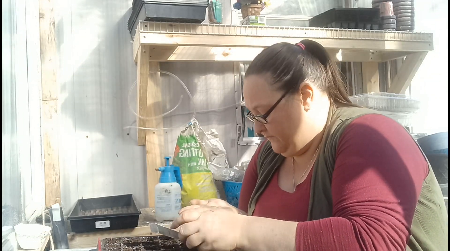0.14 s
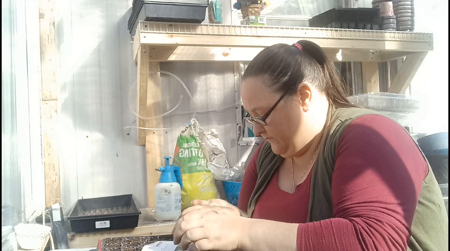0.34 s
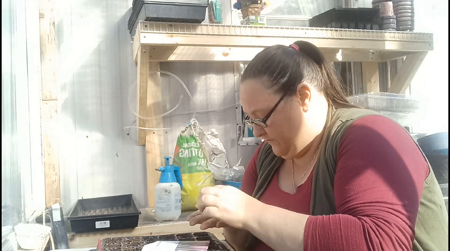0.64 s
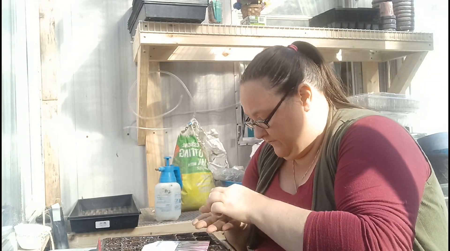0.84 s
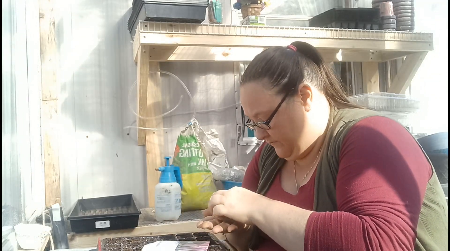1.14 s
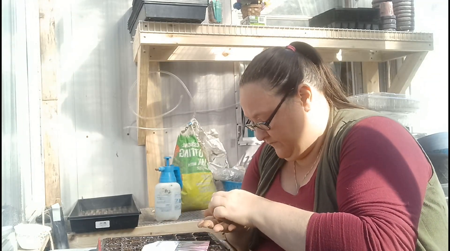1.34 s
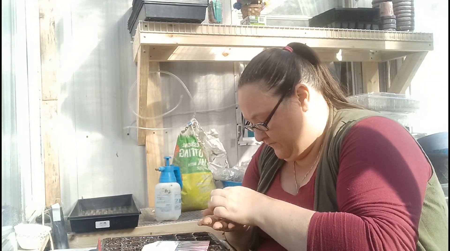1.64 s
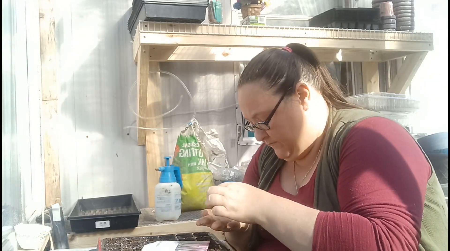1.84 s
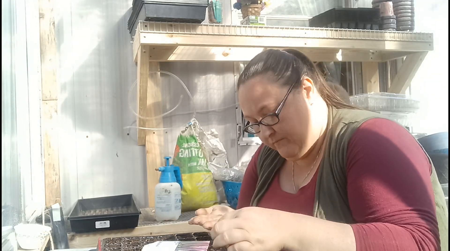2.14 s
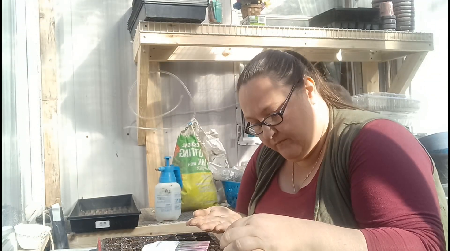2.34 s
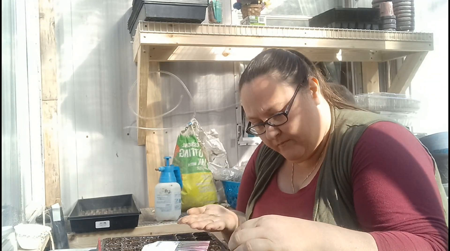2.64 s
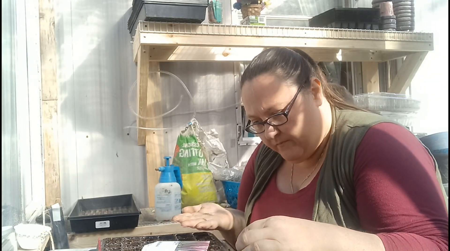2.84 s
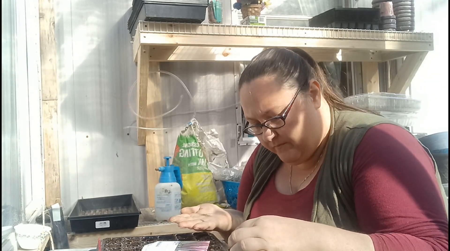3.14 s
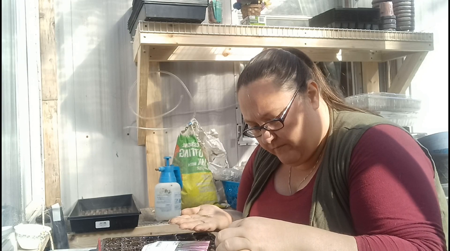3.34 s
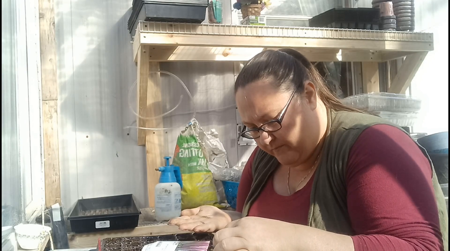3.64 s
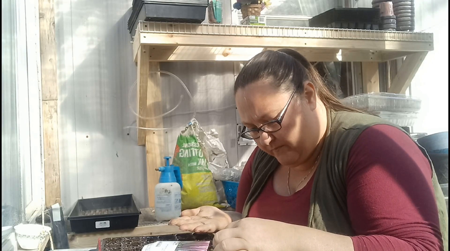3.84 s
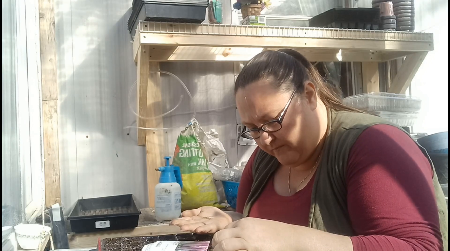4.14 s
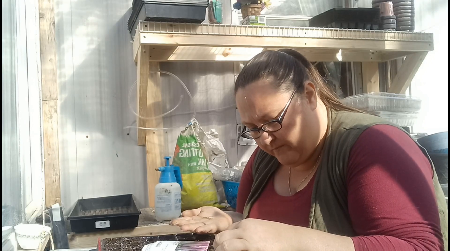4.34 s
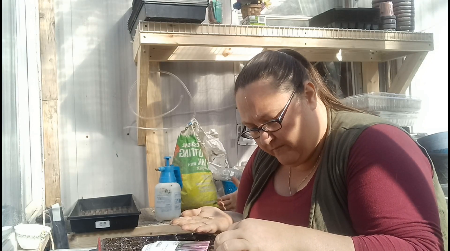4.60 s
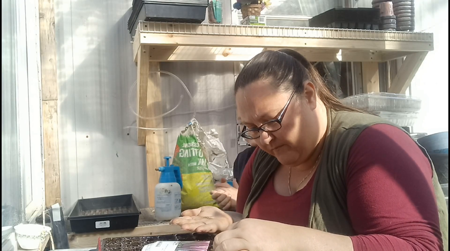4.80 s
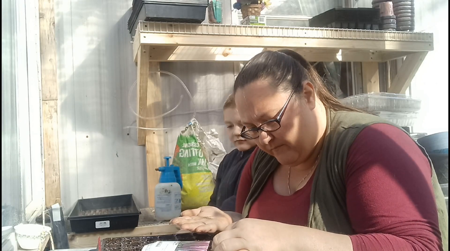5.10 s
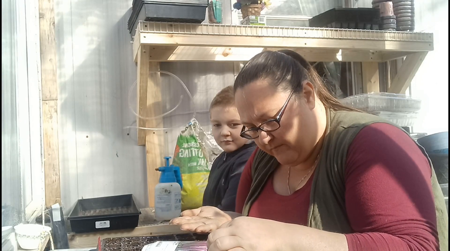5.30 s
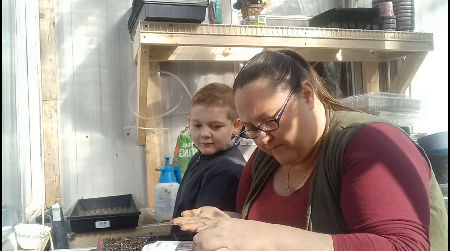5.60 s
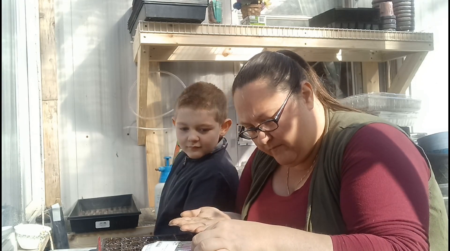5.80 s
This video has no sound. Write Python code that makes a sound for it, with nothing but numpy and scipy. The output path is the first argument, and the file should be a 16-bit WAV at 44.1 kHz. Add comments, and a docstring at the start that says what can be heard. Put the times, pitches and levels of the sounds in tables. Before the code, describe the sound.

A paper seed packet rustles softly with sliding seeds, then is flicked and tapped sharply a few times in a small greenhouse.

```python
"""A low rumble and a far bird come into a small greenhouse, where fingers rub a paper seed packet.
The paper rustles in tiny stick-slip clicks, seeds hiss as they slide inside, creases give way and hands
bump the wooden bench. Then the packet is flicked and tapped to shake the seeds out: its face pops through
and its hollow body rings. Close, hard walls wrap the sounds in a short dense echo."""
import sys
import numpy as np
from scipy import signal
from scipy.fft import rfft, irfft
from scipy.io import wavfile
from scipy.ndimage import uniform_filter1d

SR = 44100
rng = np.random.default_rng(int(sys.argv[2]) if len(sys.argv) > 2 else 0)


def transcribe(u):
    """Save the signal u as a 16-bit wav file named by the first command-line argument.

    u: samples, shape (n,) or (channels, n), limited to [-1, 1]; the rate is SR.
    q: integer samples, one column per channel.
    """
    v = np.clip(np.atleast_2d(u).T, -1, 1)
    q = np.round(v * 32767).astype(np.int16)
    wavfile.write(sys.argv[1], SR, q)


N = 262742
TIME = np.arange(N) / SR


def from_db(db):
    """Decibels to gain."""
    return 10 ** (np.asarray(db) / 20)


def rms_one(x):
    """Scale to rms 1."""
    return x / np.sqrt(np.mean(x ** 2) + 1e-20)


def at_hz(points, hz):
    """Read a curve on a log-frequency axis."""
    known_hz, values = np.transpose(points)
    return np.interp(np.log(np.maximum(hz, 1)), np.log(known_hz), values)


def convolve(x, response):
    """Filter each channel, keeping the length."""
    return signal.fftconvolve(np.atleast_2d(x), np.atleast_2d(response), axes=-1)[:, :np.shape(x)[-1]]


def body(eq, modes=(), tilt_db_per_octave=0, size=8192):
    """Minimum-phase response of unit energy: a broad EQ curve with resonant peaks on it."""
    hz = np.fft.rfftfreq(size, 1 / SR)
    level_db = at_hz(eq, hz) + tilt_db_per_octave * np.log2(np.maximum(hz, eq[0][0]))
    for centre_hz, width_hz, boost_db in modes:
        level_db = level_db + boost_db / (1 + (2 * (hz - centre_hz) / width_hz) ** 2)
    cepstrum = irfft(np.log(from_db(level_db)))[:size // 2]
    cepstrum[0] = 0
    response = irfft(np.exp(rfft(2 * cepstrum, size)))[:size // 2]
    return response / np.linalg.norm(response)


def swells(rows, drop_db=10.5, roundness=1.5):
    """Envelope in dB of overlapping swells, each drop_db down one attack before or release after its peak."""
    t, power = TIME[::32], 1e-14
    for peak_s, attack_s, release_s, level_db in rows:
        away = np.abs(t - peak_s) / np.maximum(np.where(t < peak_s, attack_s, release_s), 1 / SR)
        power = power + from_db(level_db - drop_db * away ** roundness) ** 2
    return np.interp(TIME, t, 10 * np.log10(power))


# stereo image of the room: freq_hz, left_right_correlation
ROOM_CORRELATION = [(60, 0.86), (200, 0.76), (450, 0.56), (900, -0.18), (2000, 0.14), (8000, -0.02)]

def diffuse(size):
    """Stereo noise arriving from all sides: alike in the bass, unrelated in the treble."""
    mid, side = rfft(rng.standard_normal((2, size)))
    alike = at_hz(ROOM_CORRELATION, np.fft.rfftfreq(size, 1 / SR))
    return irfft(np.sqrt(1 + alike) * mid + np.sqrt(1 - alike) * side * [[1], [-1]], size)


# reverb time of the greenhouse: freq_hz, t60_s
ROOM_DECAY = [(100, 0.37), (300, 0.22), (700, 0.24), (1500, 0.16), (4000, 0.22), (8000, 0.21),
              (14000, 0.14)]

def greenhouse(direct_db, build_s=0.0019, lumpy_db=5.0, size=16384, bands=7):
    """Room response from one spot: weak direct sound, then early reflections melting into a tail."""
    t, hz = np.arange(size) / SR, np.fft.rfftfreq(size, 1 / SR)
    reflections = from_db(lumpy_db * np.clip(rng.standard_normal(size), -2, 2) * np.exp(-t / 0.0079))
    field = rfft(diffuse(size) * reflections / np.sqrt(uniform_filter1d(reflections ** 2, size=201)))
    centres_hz, tail = np.geomspace(100, 15000, bands), 0
    for centre_hz, share in zip(centres_hz, np.eye(bands)):
        band = irfft(field * at_hz(np.c_[centres_hz, share], hz))
        tail = tail + band * from_db(-60 * t / at_hz(ROOM_DECAY, centre_hz))
    tail = tail * (1 - np.exp(-t / build_s))
    response = tail / np.linalg.norm(tail, axis=1, keepdims=True)
    response[:, 0] += from_db(direct_db)
    return response / np.linalg.norm(response, axis=1, keepdims=True)


# soft low thumps: peak_s, attack_s, release_s, level_db
LOW_THUMPS = [(0.15, 0.21, 0.24, -70.5), (2.18, 0.093, 0.043, -56), (2.85, 0.062, 0.039, -64),
              (3.83, .04, 0.045, -61.5), (4.08, 0.07, 0.095, -70.5), (4.6, 0.23, 0.37, -64.5),
              (4.83, 0.042, 0.077, -53.5), (5.53, 0.1, 0.2, -52.5)]
# tone of the low end (rumble and thumps) and of the air: freq_hz, gain_db
LOW_END_EQ = [(20, -44), (40, -13), (55, -3.5), (68, -2), (80, 3), (100, -10.5), (150, -25), (300, -36),
              (800, -31.5)]
AIR_EQ = [(88, -40), (150, 1), (366, -9.5), (844, -14.5), (3000, -9), (7270, -2), (9180, -8), (12800, -2.5),
          (15500, -7)]

def ambience(rumble_db=-73.5, wander_db=0.4, wander_s=0.081, air_db=-72):
    """A steady low rumble, with soft low thumps from handling and perhaps footsteps, under a faint hiss."""
    wander = np.interp(TIME / wander_s, np.arange(64), rng.standard_normal(64))
    envelope = np.hypot(from_db(rumble_db - wander_db * wander), from_db(swells(LOW_THUMPS)))
    low_end = envelope * rms_one(convolve(diffuse(N), body(LOW_END_EQ)))
    air = from_db(air_db) * rms_one(convolve(diffuse(N), body(AIR_EQ)))
    return low_end + air


# faint high calls, all from a far bird except the short whistle at 0.35 s: start_s, length_s, start_pitch_hz,
# end_pitch_hz, level_db
BIRD_CHIRPS = [(0.0, .05, 3480, 3540, -73), (0.13, .13, 3800, 3950, -75.5), (0.35, .07, 3560, 3620, -76),
               (1.043, .13, 3260, 3260, -75.5), (1.097, .07, 3810, 4100, -76),
               (1.337, .08, 3680, 3400, -76.5), (1.64, .04, 7400, 6740, -77), (2.35, .07, 3060, 3310, -81)]

def bird(warble=0.053):
    """A far bird sings short warbling glides, blurred by the walls; the short whistle at 0.35 s is not the
    bird's."""
    song = np.zeros(N)
    for start_s, length_s, start_hz, end_hz, level_db in BIRD_CHIRPS:
        progress = (TIME - start_s) / length_s
        singing = (progress > 0) & (progress < 1)
        waver = rms_one(uniform_filter1d(rng.standard_normal(N), size=50))[singing]
        pitch_hz = (start_hz + (end_hz - start_hz) * progress[singing]) * (1 + warble * waver)
        envelope = from_db(level_db) * 2 * np.sin(np.pi * progress[singing])
        song[singing] += envelope * np.sin(2 * np.pi * np.cumsum(pitch_hz) / SR)
    return convolve(song, greenhouse(direct_db=-20))


def slips(per_s, spread_db, size):
    """Tiny stick-slip clicks at random moments, a few much larger than the rest; rms 1."""
    strengths = from_db(spread_db * np.minimum(rng.exponential(1, size), 4)) * rng.choice([-1, 1], size)
    return rms_one(strengths * (rng.random(size) < per_s / SR))


def friction(level_db, eq, per_s, spread_db, flutter_db, direct_db, modes=(), spots=5):
    """Firmer rubbing makes more and louder slips, catching unevenly at spots that each echo differently."""
    rate = per_s * from_db((level_db - level_db.max()) / 2)
    flutter = from_db(flutter_db * rms_one(uniform_filter1d(rng.standard_normal(N), size=400)))
    grains = from_db(level_db) * rms_one(slips(rate, spread_db, N) / np.sqrt(rate) * flutter)
    spot = rng.integers(0, spots, N)
    echoed = sum(convolve(grains * (spot == k), greenhouse(direct_db)) for k in range(spots))
    return convolve(echoed, body(eq, modes))


# finger strokes on the packet: peak_s, attack_s, release_s, paper_db, seeds_db
FINGER_STROKES = [(0.03, 0.17, 0.22, -78, -59.5), (0.388, 0.11, 0.21, -69.5, -59.5),
                  (0.57, 0.1, .08, -66.5, -65), (0.66, 0.035, 0.061, -63, -52),
                  (0.744, 0.08, 0.016, -56, -51), (0.81, .045, 0.021, -43.5, -42.5),
                  (0.874, 0.022, 0.034, -54, -52.5), (1.228, 0.14, 0.12, -65.5, -62),
                  (1.47, 0.15, 0.097, -66.5, -63), (1.85, 0.15, 0.071, -64, -61),
                  (2.06, 0.094, 0.063, -65.5, -56), (2.57, 0.25, 0.19, -73.5, -60),
                  (3.332, 0.15, 0.16, -57, -51.5), (3.506, 0.085, 0.055, -54, -51.5),
                  (3.68, 0.082, 0.087, -49.5, -47), (3.721, 0.047, 0.027, -52, -35),
                  (3.804, 0.078, 0.085, -55.5, -34.5), (3.95, 0.039, 0.043, -42.5, -39.5),
                  (4.086, 0.057, 0.053, -52, -53), (4.213, 0.06, 0.029, -58, -48.5),
                  (4.501, 0.28, 0.24, -61, -56.5), (4.719, 0.035, 0.066, -47.5, -44.5),
                  (4.96, 0.18, 0.18, -63.5, -56.5), (5.17, 0.15, .11, -51.5, -49),
                  (5.611, 0.22, 0.18, -52, -48), (5.828, 0.15, 0.14, -56.5, -49)]
# tone of the sleeves, the rubbed paper and the sliding seeds: freq_hz, gain_db
SLEEVE_EQ = [(100, 1.5), (200, 1.5), (350, -6.5), (550, -1.5), (750, -10), (1200, -29), (3000, -12)]
PAPER_EQ = [(150, -38), (400, -15.5), (620, -9.5), (900, -4.5), (1250, -1.5), (1900, -2.5), (3500, -1.5),
            (6000, -5.5), (9000, -10.5), (15000, -28.5)]
SEED_EQ = [(300, -36), (1500, -40), (3000, -18.5), (5000, -10.5), (7500, -6), (9500, -10), (11000, -5.5),
           (12500, -2), (14500, -5), (16000, -1.5)]
# hollow ring of the rubbed packet: centre_hz, width_hz, boost_db
PAPER_MODES = [(760, 58, -1), (1245, 420, 5), (1740, 170, 3), (3460, 190, -1)]

def strokes(sleeve_peak_db=-63.5, sleeve_follow=0.62):
    """With each stroke the paper rustles, sliding seeds and fibres hiss, and sleeves brush the bench."""
    peak_s, attack_s, release_s, paper_peaks_db, seed_peaks_db = np.transpose(FINGER_STROKES)
    paper_db = swells(zip(peak_s, attack_s, release_s, paper_peaks_db))
    seeds_db = swells(zip(peak_s, attack_s, release_s, seed_peaks_db))
    sleeve_db = sleeve_peak_db + sleeve_follow * (paper_db - paper_db.max())
    sleeve = friction(sleeve_db, SLEEVE_EQ, per_s=15000, spread_db=4, flutter_db=1, direct_db=-5)
    paper = friction(paper_db, PAPER_EQ, per_s=9000, spread_db=1, flutter_db=2.5, direct_db=-12,
                     modes=PAPER_MODES)
    seeds = friction(seeds_db, SEED_EQ, per_s=6000, spread_db=5.5, flutter_db=1.5, direct_db=-10.5)
    return (sleeve + paper + seeds) * from_db([[.5], [-.5]])  # a touch to the left


def hits(rows, eq, modes, crackle_db, direct_db, size=8192, spots=2):
    """Each hit is one click and a dying crackle of fibre slips, coloured by the body and the room."""
    track, t = np.zeros((2, N)), np.arange(size) / SR
    for start_s, level_db, decay_s, tilt_db_per_octave, pan_left_db in rows:
        force = slips(9000, 1.1, size) * np.exp(-t / decay_s) * from_db(crackle_db)
        force[0] += 1  # the opening click
        spot = rng.integers(0, spots, size)
        echoed = sum(signal.fftconvolve([force * (spot == k)], greenhouse(direct_db), axes=-1)
                     for k in range(spots))
        hit = convolve(echoed, body(eq, modes, tilt_db_per_octave))
        hit *= np.sqrt(0.054 * SR) / np.linalg.norm(hit)  # the energy of 54 ms at rms 1
        start = round(start_s * SR)
        hit = hit[:, :N - start] * from_db(level_db + np.array([[pan_left_db], [-pan_left_db]]) / 2)
        track[:, start:start + hit.shape[1]] += hit
    return track


# paper snaps: start_s, level_db, decay_s, tilt_db_per_octave, pan_left_db
CREASE_HITS = [(0.092, -62, 0.0083, 22, 6), (0.211, -56.5, 0.0017, 15.5, 2), (1.7155, -53, 0.0018, 11.5, 3),
               (1.724, -55, 0.029, -1.5, 0.5), (2.111, -51, 0.0034, 2.5, 4.5),
               (2.121, -44.5, .019, -3.5, -1), (3.046, -65, 0.0017, 25, 14), (3.318, -52, .006, 9.5, 1),
               (3.492, -52.5, 0.011, 8, 4), (3.7125, -28, .002, 29, 6), (3.934, -38.5, 0.0062, 16.5, 15),
               (4.795, -43, .004, -3.5, 2), (4.8005, -28, 0.01, 3.6, 1.5), (4.8053, -32, 0.004, 4, -5.5),
               (4.926, -46, 0.00054, 17, 2)]
# crisp tone of the creases, with a dip near 9.7 kHz that is not the paper's: freq_hz, gain_db
CREASE_EQ = [(60, -24), (200, -6), (450, 2), (750, 4.5), (1100, 4), (2600, 7), (3900, 1.5), (5500, 0),
             (8000, -3), (9700, -18), (12500, -9.5), (15500, -17)]
# their ring: centre_hz, width_hz, boost_db
CREASE_RING = [(1120, 150, 9.5), (1742, 320, 6.2), (2580, 190, 3.8), (8300, 760, 1.3)]

def creases():
    """Creases in the paper give way with sharp ticks."""
    return hits(CREASE_HITS, CREASE_EQ, CREASE_RING, crackle_db=-23, direct_db=-17)


# soft thuds: start_s, level_db, decay_s, tilt_db_per_octave, pan_left_db
BENCH_HITS = [(0.37, -74, .1, 4.5, 1), (1.73, -61, 0.038, -11, 1.4), (2.133, -59, 0.068, -1.5, 1),
              (2.172, -55, 0.0099, 1.5, 1), (2.235, -90, 0.059, 5, 1)]
# their dull tone: freq_hz, gain_db
BENCH_EQ = [(60, -30), (125, 0), (180, -1), (290, 11.5), (400, -6), (700, -3.5), (1400, -22), (4000, -37)]

def bench_bumps():
    """Hands and sleeves bump the wooden bench, more scuff than click."""
    return hits(BENCH_HITS, BENCH_EQ, modes=(), crackle_db=5, direct_db=-10)


# two clicks that fuse into one pop: start_s, level_db, decay_s, tilt_db_per_octave, pan_left_db
POP_HITS = [(4.1095, -32.5, 0.0035, 0.44, 1), (4.114, -25.5, 0.0014, 0.57, 0.22)]
# EQ on the pop: freq_hz, gain_db
POP_EQ = [(60, -15), (300, -17), (550, -13), (1000, -2.5), (1700, -2.5), (2700, 2.5), (4000, 0.5),
          (7000, -7), (9000, -16), (12500, -5.5), (15500, -7)]
# its ring: centre_hz, width_hz, boost_db
POP_RING = [(1060, 430, 1.8), (2540, 670, 3.5)]

def packet_pop():
    """The face of the packet pops through."""
    return hits(POP_HITS, POP_EQ, POP_RING, crackle_db=-10.5, direct_db=-9.5)


# light contacts: start_s, level_db, decay_s, tilt_db_per_octave, pan_left_db
TOUCH_HITS = [(4.208, -55.5, 0.0035, .2, 1), (4.366, -56.5, 0.0024, -.3, 1), (4.559, -48.5, 0.0032, -.3, 0)]
# their narrow midrange tone: freq_hz, gain_db
TOUCH_EQ = [(200, -25), (700, -22), (1000, -4), (1250, 4.5), (1900, -12.5), (2600, -11), (4000, -16.5),
            (15000, -53)]

def finger_touches():
    """A finger lightly touches the hollow packet between the louder hits."""
    return hits(TOUCH_HITS, TOUCH_EQ, modes=(), crackle_db=-12, direct_db=-2)


# three contacts that fuse into one knock: start_s, level_db, decay_s, tilt_db_per_octave, pan_left_db
TAP_HITS = [(4.4498, -28, 0.0023, -1, 0.86), (4.453, -21.5, 0.0046, -0.61, 0),
            (4.4625, -32, 0.0032, 0.061, 0)]
# its boxy tone: freq_hz, gain_db
TAP_EQ = [(60, -46), (130, -28.5), (250, -12.5), (450, -0.5), (720, 2.5), (1150, 5.5), (1500, -4.5),
          (2700, -6), (4200, -13), (5600, -24), (7200, -12), (9000, -15.5), (12000, -9), (15500, -15)]
# its ring: centre_hz, width_hz, boost_db
TAP_RING = [(215, 70, 2), (293, 22, 9), (450, 41, 0.5), (493, 35, 1.5), (626, 45, 6), (740, 69, 7.5),
            (1240, 37, -2), (5250, 550, 14), (5840, 1170, 19)]

def fingertip_tap():
    """A fingertip knocks on the packet and rings its hollow body."""
    return hits(TAP_HITS, TAP_EQ, TAP_RING, crackle_db=-14.5, direct_db=-12.5)


def scene():
    """The close handling sounds over the bird and the ambience."""
    packet_hits = creases() + packet_pop() + fingertip_tap() + finger_touches()
    return packet_hits + bench_bumps() + strokes() + bird() + ambience()


# balance between the two microphone ports: freq_hz, pan_left_db
PORT_BALANCE = [(60, 3), (200, 8.5), (500, -1), (1000, 1), (2200, 3.5), (5000, 1.5), (9000, 1.5),
                (13000, 5.5)]

def record(dry, cutoff_hz=15750):
    """The two microphone ports colour the sound differently; a steep low-pass cuts the top."""
    pan_left_db = at_hz(PORT_BALANCE, np.fft.rfftfreq(2 * N, 1 / SR))
    port_gains = from_db(pan_left_db * np.array([[1], [-1]]) / 2)
    heard = irfft(rfft(dry, 2 * N) * port_gains)[:, :N]
    return signal.sosfilt(signal.ellip(12, .1, 80, cutoff_hz, fs=SR, output="sos"), heard)


dry = scene()
out = record(dry)
transcribe(out)
```